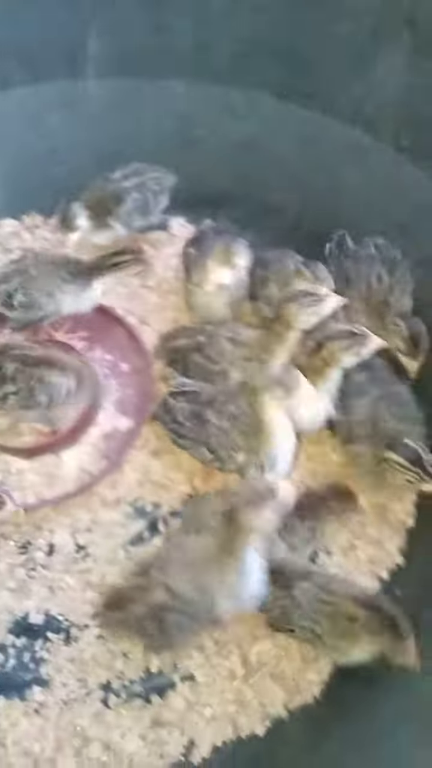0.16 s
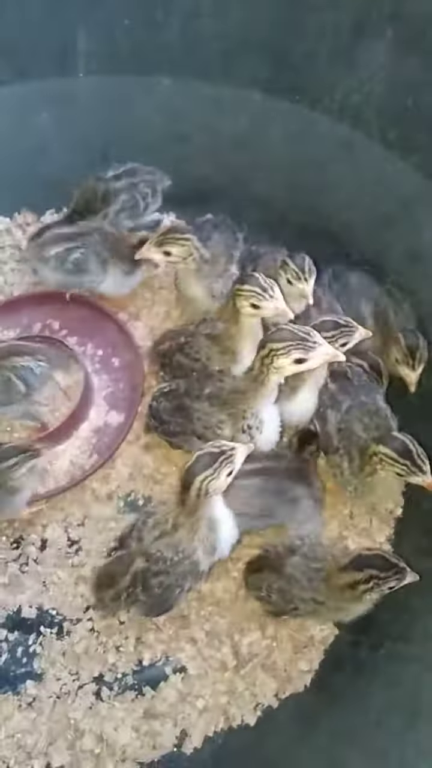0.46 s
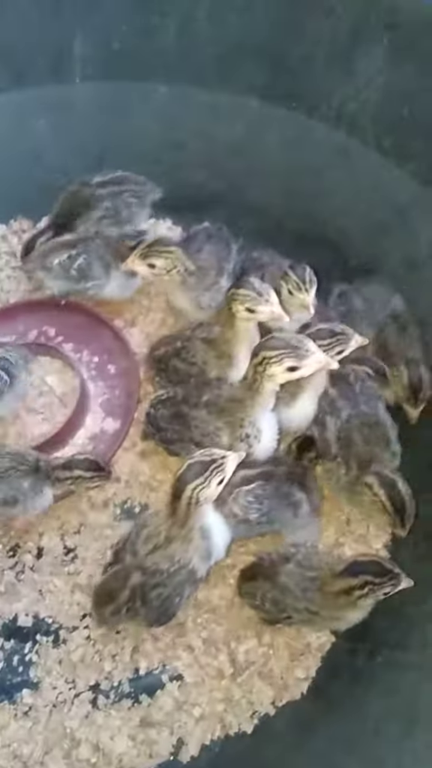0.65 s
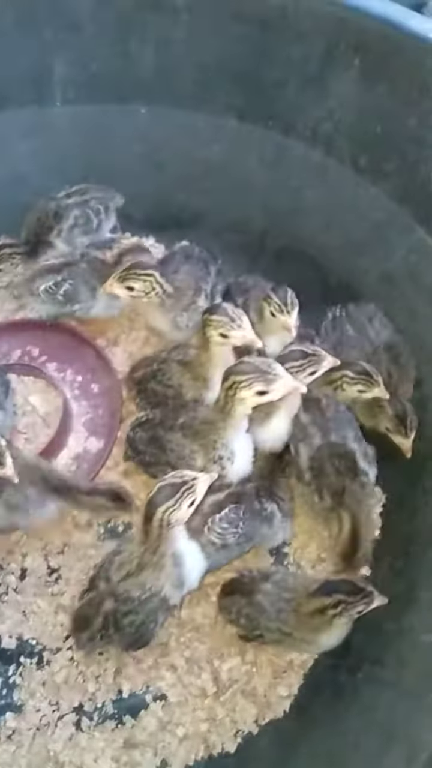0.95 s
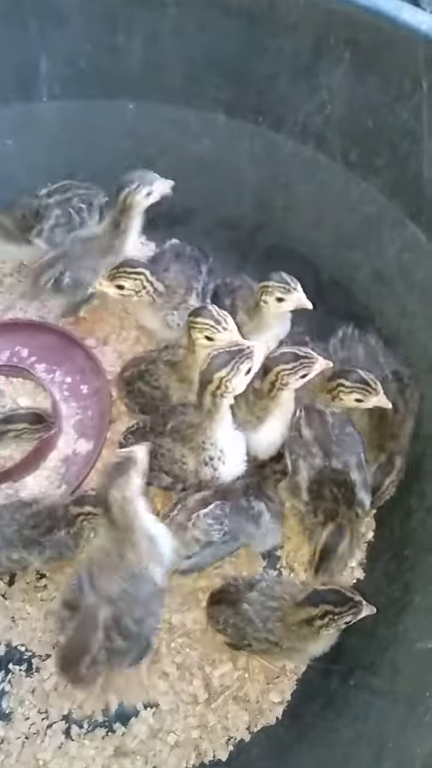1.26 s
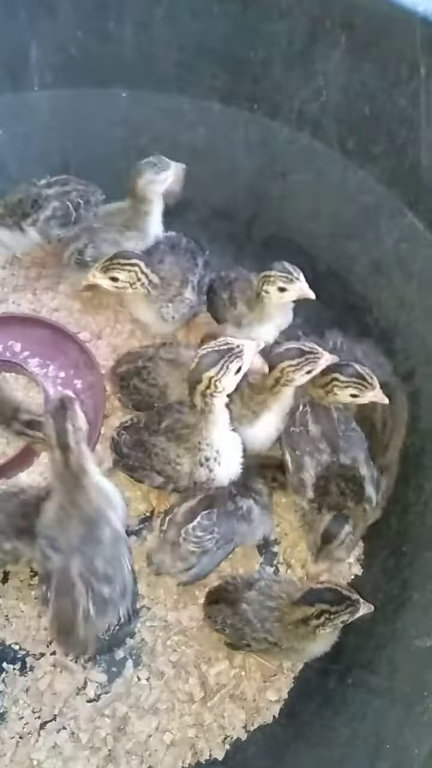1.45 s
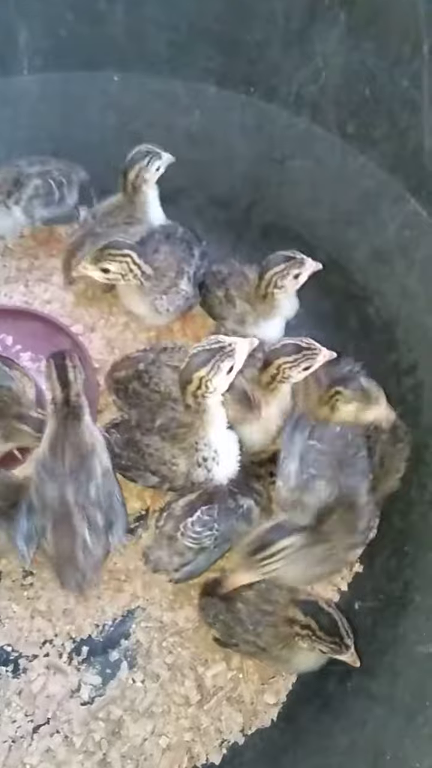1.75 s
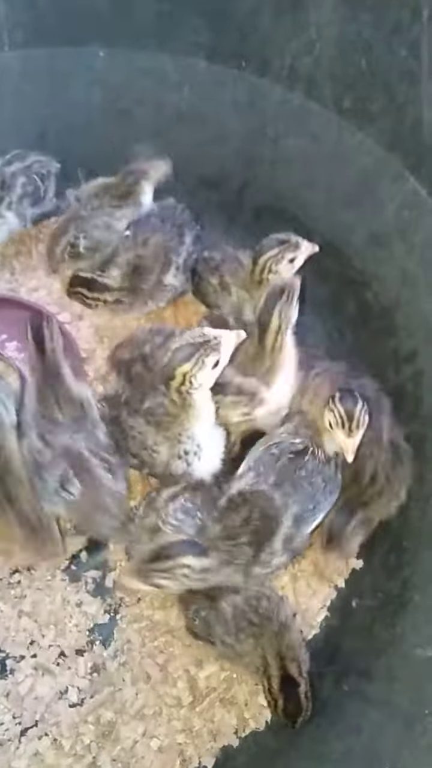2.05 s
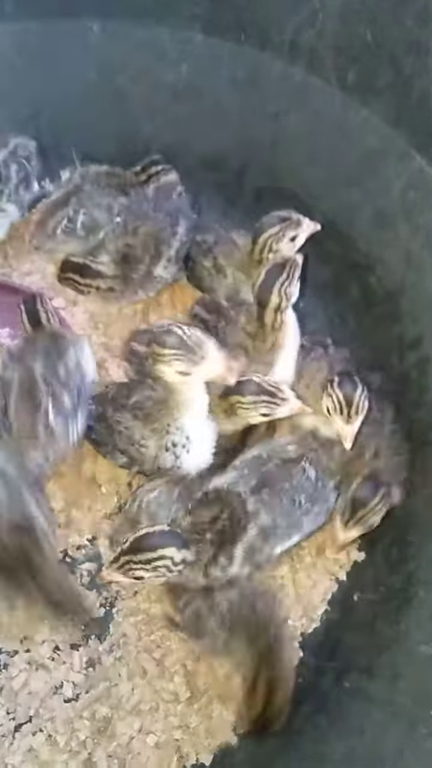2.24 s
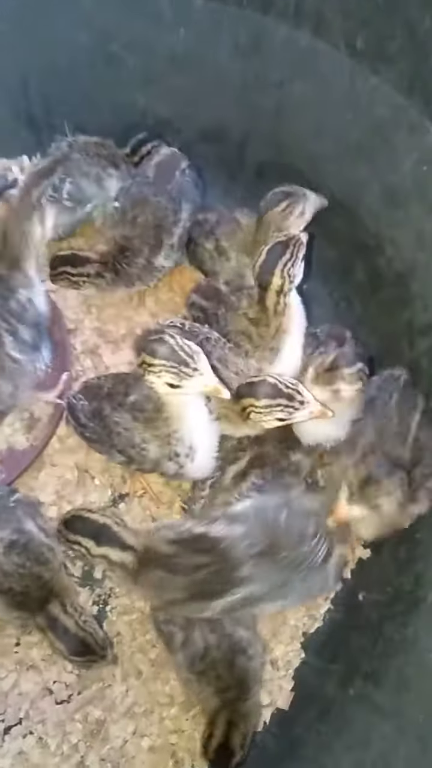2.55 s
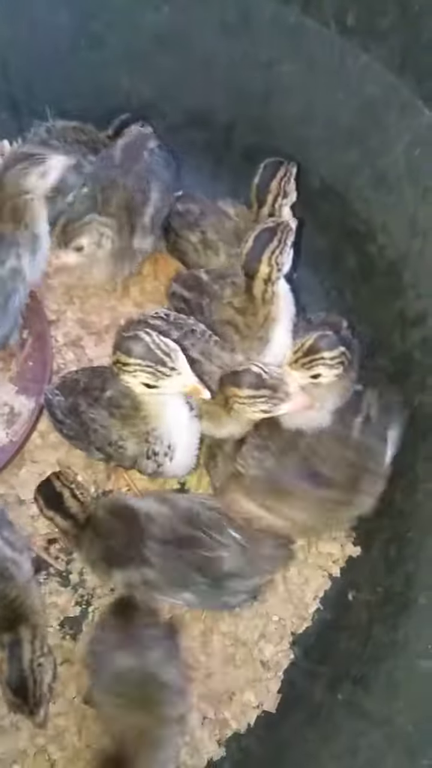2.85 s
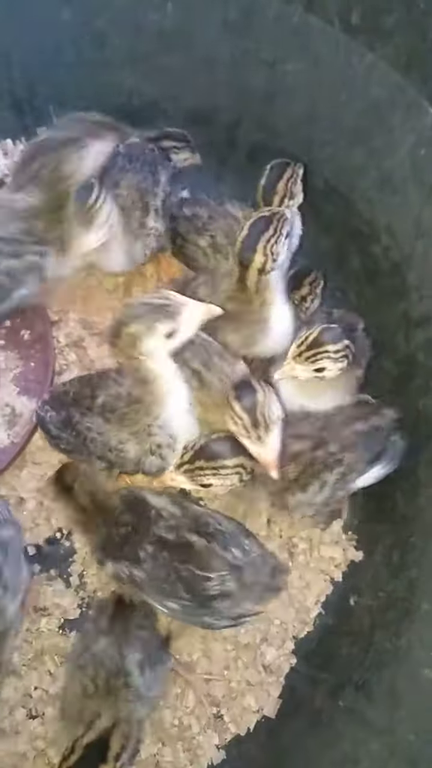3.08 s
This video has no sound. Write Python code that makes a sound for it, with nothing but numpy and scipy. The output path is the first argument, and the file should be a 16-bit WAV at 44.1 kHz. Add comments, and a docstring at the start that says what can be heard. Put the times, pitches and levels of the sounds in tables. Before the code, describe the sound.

Young guinea fowl chicks peep and trill in a plastic tub, feet rustling dry shavings, engines droning faintly

```python
"""Outdoors by a plastic tub: guinea fowl chicks peep and trill, tick on the tub and scuff wood shavings.
Chicks are near-sine whistles; shavings are shaped noise grains; ticks are noise snaps with a short ring.
Outside, two idling engines drone as low multiples of a firing cycle, over traffic murmur and hiss.
A near cricket sweeps sines, a far one is bursts of noise; high-pitched insects are pulsed noise and sweeps."""
import sys
import numpy as np
from scipy import signal
from scipy.fft import rfft, irfft, next_fast_len
from scipy.io import wavfile
from scipy.ndimage import uniform_filter1d

SR = 44100
rng = np.random.default_rng(int(sys.argv[2]) if len(sys.argv) > 2 else 0)


def inscribe(sig):
    """Save sig as 16-bit PCM at rate SR to the path in sys.argv[1].

    A 1-D sig is mono; a 2-D sig holds one channel per row.
    Samples are clipped to [-1, 1] before scaling.
    """
    pcm = np.round(np.clip(np.atleast_2d(sig).T, -1, 1) * 32767)
    wavfile.write(sys.argv[1], SR, pcm.astype(np.int16))


N = 141561


def from_db(db):
    """Amplitude factor of a level in dB."""
    return 10 ** (np.asarray(db) / 20)


def rms_one(x):
    """Scale to rms 1."""
    return x / np.sqrt(np.mean(x ** 2) + 1e-20)


def clock():
    """Time of every sample in seconds."""
    return np.arange(N) / SR


def in_time(rows):
    """Straight lines through the columns of (s, value, ...) rows, one curve per column."""
    s, *columns = np.transpose(rows)
    return [np.interp(clock(), s, column) for column in columns]


def drift(rate_hz):
    """Slow chance of spread 1: noise through a double low-pass, computed at every 40th sample."""
    r = np.exp(-80 * np.pi * rate_hz / SR)
    noise = rng.standard_normal(N // 40 + 2002)
    slow = signal.lfilter([1], [1, -2 * r, r * r], noise)[2000:]  # drop the filter's start
    return np.interp(np.arange(N) / 40, np.arange(len(slow)), rms_one(slow))


def coloured(x, points):
    """Shape a spectrum by (Hz, dB) points joined along log frequency; rms 1."""
    hz, db = np.transpose(sorted(map(tuple, points)))
    size = next_fast_len(N)
    bins = np.maximum(np.arange(size // 2 + 1) * SR / size, 1)
    gain = from_db(np.interp(np.log(bins), np.log(hz), db))
    return rms_one(irfft(rfft(x, size) * gain, size)[:N])


def resonance(x, hz, width_hz):
    """Two-pole band-pass ringing at one frequency."""
    r = np.exp(-np.pi * width_hz / SR)
    poles = [2, -4 * r * np.cos(2 * np.pi * hz / SR), 2 * r * r]
    return signal.lfilter([1 - r * r, 0, r * r - 1], poles, x)


def narrow_noise(x, hz, width_hz):
    """Noise through the same resonance twice; rms 1."""
    return rms_one(resonance(resonance(x, hz, width_hz), hz, width_hz))


def bumps(rows, width_s):
    """Swells peaking at (s, dB): quick rise, slower fall."""
    total = 0
    for s, db in rows:
        age = np.maximum((clock() - s) / width_s + 1, 0)
        total = total + from_db(db) * age * np.exp(1 - age)
    return total


def add(out, s, sound):
    """Mix a sound in at a time, cut at the end of the scene."""
    i = int(s * SR)
    out[i:i + len(sound)] += sound[:max(N - i, 0)]


def glide(from_hz, to_hz, length_s, db):
    """A short sine sweep under a smooth window."""
    n = int(length_s * SR)
    phase = 2 * np.pi * np.cumsum(np.linspace(from_hz, to_hz, n)) / SR
    return from_db(db) * np.sqrt(2) * np.hanning(n) ** 0.11 * np.sin(phase)


# spectrum of the traffic murmur: [f/Hz, relative level/dB]
MURMUR_SPECTRUM = [(25, -6), (70, -4.5), (150, 0), (280, -11), (900, -14), (2500, -27.5), (6000, -83)]
# murmur level, before its waver: [t/s, level/dB]
MURMUR_LEVEL = [(0, -53), (3.21, -48)]
# spectrum of the outdoor hiss: [f/Hz, relative level/dB]
HISS_SPECTRUM = [(3000, -3), (6600, -12), (11000, -13), (15800, -9)]
HISS_DB = -57.5


def air():
    """Traffic murmur and outdoor hiss: shaped noise, each with its own chance level flicker."""
    level_db, = in_time(MURMUR_LEVEL)
    hiss_db = HISS_DB + 2.2 * drift(14)
    murmur_db = level_db + 1.27 * drift(10.7)
    murmur = from_db(murmur_db) * coloured(rng.standard_normal(N), MURMUR_SPECTRUM)
    return murmur + from_db(hiss_db) * coloured(rng.standard_normal(N), HISS_SPECTRUM)


BUZZ_HZ, BUZZ_WIDTH_HZ, BUZZ_DB = 8113, 650, -61.5
PULSES_PER_S, PULSE_START_S, PULSE_DEPTH = 145.52, .0012, .55
GROUP_S, STROKE_S, STROKE_LEN_S = .041, 0.013, 0.008  # mean group spacing, stroke spacing, length
STROKE_RISE_HZ, STROKE_GROWTH_DB = 535, 5.5
# last stroke of a group, before its chance: [t/s, level/dB]
STROKES = [(0, -58), (3.21, -48.5)]


def insects():
    """A steady pulsed noise buzz and groups of three swelling, rising strokes, both near 8 kHz."""
    band = narrow_noise(rng.standard_normal(N), BUZZ_HZ, BUZZ_WIDTH_HZ)
    pulse = 1 + PULSE_DEPTH * np.cos(2 * np.pi * PULSES_PER_S * (clock() - PULSE_START_S))
    out = from_db(BUZZ_DB) * band * pulse
    chance = rng.standard_normal((120, 4))
    starts = np.cumsum(GROUP_S * (1 + 0.14 * chance[:, 3]))
    low_hz, high_hz = BUZZ_HZ - STROKE_RISE_HZ / 2, BUZZ_HZ + STROKE_RISE_HZ / 2
    for s, row in zip(starts, chance):
        last_db = np.interp(s, *np.transpose(STROKES))
        for k in range(3):
            db = last_db + STROKE_GROWTH_DB * (k - 2) + 2.5 * row[k]
            add(out, min(s + k * STROKE_S, N / SR), glide(low_hz, high_hz, STROKE_LEN_S, db))
    return out


# far chirps: [t/s]
FAR_CHIRPS = [.217, .364, 0.52, .657, .818, 1.011, 1.07, 1.185, 1.351, 1.506, 1.656]
FAR_DB, FAR_HZ, FAR_WIDTH_HZ, FAR_S = -56, 4880, 1470, 0.016


def far_cricket():
    """Bursts of narrow noise, blurred by distance."""
    bursts = bumps([(s, FAR_DB) for s in FAR_CHIRPS], FAR_S) * from_db(3.0 * drift(64))
    return bursts * narrow_noise(rng.standard_normal(N), FAR_HZ, FAR_WIDTH_HZ)


# near chirps: [t/s, level/dB]
NEAR_CHIRPS = [(2.687, -50.5), (2.882, -48), (3.08, -48)]
NOTE_GAP_S, NOTE_S, NOTE_TOP_HZ, NOTE_END_HZ = 0.031, 0.017, 5550, 4700
FIRST_NOTE_DB = -2.5  # relative to the other two


def near_cricket():
    """Chirps of three clear falling sine sweeps."""
    out = np.zeros(N)
    for s, db in NEAR_CHIRPS:
        for k in range(3):
            note_db = db + FIRST_NOTE_DB * (k == 0)
            add(out, s + k * NOTE_GAP_S, glide(NOTE_TOP_HZ, NOTE_END_HZ, NOTE_S, note_db))
    return out


HUM_WAVER_DB = 2.5


def hum(hz, db, orders):
    """Low multiples of a firing cycle, each wavering a little."""
    phase = 2 * np.pi * np.cumsum(hz + np.zeros(N)) / SR
    total = 0
    for k, order_db in orders:
        gain = from_db(order_db + HUM_WAVER_DB * drift(1.7))
        total = total + gain * np.sin(k * phase + rng.uniform(0, 2 * np.pi))
    return from_db(db) * total


# first engine, firing cycle: [t/s, f/Hz, level/dB]
FIRST_ENGINE = [(0, 17.1, -51.5), (1.4, 17.6, -47.5), (3.21, 17.0, -45)]
# its multiples from 2 to 12: [relative level/dB]
FIRST_ORDERS = [-14, -11, -35, -3.5, 3, -16, -6, -10.5, -8.5, -22, -19]
SECOND_HZ = 40.94
# second engine, growing louder: [t/s, level/dB]
SECOND_ENGINE = [(0, -47.5), (3.21, -38.5)]
# its multiples: [multiple, relative level/dB]
SECOND_ORDERS = [(1, -3.5), (3, -3.5), (4, -9.5), (5, -12.5), (6, -25)]


def engines():
    """Two idling engines: one with a drifting firing cycle, one steady in pitch."""
    first = hum(*in_time(FIRST_ENGINE), enumerate(FIRST_ORDERS, start=2))
    return first + hum(SECOND_HZ, *in_time(SECOND_ENGINE), SECOND_ORDERS)


TUB_T60_S, TUB_DB = .05, -12


def tub(x):
    """Short diffuse echo of the tub: decaying noise after 2 ms, added to the direct sound."""
    t = np.arange(SR // 8) / SR
    tail = rng.standard_normal(len(t)) * from_db(-60 * t / TUB_T60_S) * (t > .002)
    return x + from_db(TUB_DB) * signal.fftconvolve(x, tail / np.sqrt(np.sum(tail ** 2)))[:N]


# scuffing feet, before their flicker: [t/s, level/dB]
SCUFFS = [(.21, -57), (.66, -53), (.78, -51.5), (1.29, -50), (1.52, -56), (1.67, -52.5), (1.87, -52),
          (2.02, -59.5), (2.11, -52), (2.28, -53.5), (2.36, -58), (2.572, -53.5), (2.73, -52)]
# spectrum of the dry shavings: [f/Hz, relative level/dB]
SHAVINGS = [(700, 12), (3000, 4), (12000, 0.5), (15500, 3.5)]
SCUFF_S, GRAINS_PER_S = 0.024, 3700
PATTER_DB, PATTER_DB_PER_S = -74.5, 4  # start and rise of the small shuffling: the flock grows busier
TILT_DB = 6.5  # chance swing of the treble


def scuffs():
    """Dense uneven grains of dry shavings under each step, over continuous flickering, growing patter."""
    grain_level = from_db(5.6 * np.minimum(rng.exponential(1, N), 3.3))
    grains = grain_level * rng.standard_normal(N) * (rng.random(N) < GRAINS_PER_S / SR)
    steps = bumps(SCUFFS, SCUFF_S) * from_db(3 * drift(60))
    patter = from_db(PATTER_DB + PATTER_DB_PER_S * clock() + 4 * drift(30))
    rustle = coloured(grains + 0.42 * rng.standard_normal(N), SHAVINGS)
    low_pass = signal.butter(4, 11500, "low", fs=SR, output="sos")
    high_pass = signal.butter(4, 11500, "high", fs=SR, output="sos")
    body = signal.sosfilt(low_pass, rustle)
    treble = signal.sosfilt(high_pass, rustle[::-1])  # reversed: fine and coarse grains fall apart
    return (steps + patter) * (body + treble * from_db(TILT_DB * drift(10)))


# claws and beaks on the tub: [t/s, level/dB, f/Hz]
TICKS = [(0.171, -41, 780), (0.332, -38, 920), (.435, -45, 14100), (0.473, -38.5, 5800), (.942, -40, 1240),
         (1.283, -43.5, 1400), (1.409, -32, 8400), (1.61, -34.5, 1640), (1.831, -38, 955),
         (1.847, -37.5, 5060), (2.026, -41.5, 2830), (2.274, -36, 1750), (2.339, -32.5, 2470),
         (2.755, -43, 14000), (2.849, -36, 1710), (2.881, -47, 3940)]
TICK_CYCLES, TICK_SNAP = 2.4, 0.43  # ring decay in cycles; snap relative to ring


def ticks():
    """A sharp noise snap and a few cycles of ring at the same pitch."""
    out, noise = np.zeros(N), rng.standard_normal((len(TICKS), 600))
    t = np.arange(600) / SR
    for (s, db, hz), hit in zip(TICKS, noise):
        ring = np.sin(2 * np.pi * hz * t) * np.exp(-t * hz / TICK_CYCLES)
        snap = TICK_SNAP * narrow_noise(hit, hz, hz) * np.exp(-t / .002)
        add(out, s, from_db(db) * (ring + snap))
    return out


# soft twitter of the rest, loudest notes: [t/s, level/dB]
FLOCK = [(0, -60), (3.21, -63)]
FLOCK_HZ, FLOCK_NOTE_S = 3090, 0.0376


def twitter():
    """Ninety soft short glides at chance times, pitches, lengths and levels."""
    out = np.zeros(N)
    for when, a, b, c in rng.random((90, 4)):
        s, hz = when * N / SR, FLOCK_HZ * (0.89 + 0.31 * a)
        db = np.interp(s, *np.transpose(FLOCK)) - 8 * c  # longer notes are softer
        add(out, s, glide(hz, hz * (.9 + 0.168 * b), FLOCK_NOTE_S * (.5 + c), db))
    return out


# faint low clucks: [t/s, f/Hz, level/dB]
CLUCKS = [(0.757, 1603, -51), (1.436, 2000, -55.5)]
CLUCK_S = 0.015  # half length


def clucks():
    """Short low glides, rising slightly."""
    out = np.zeros(N)
    for s, hz, db in CLUCKS:
        add(out, s - CLUCK_S, glide(0.97 * hz, 1.053 * hz, 2 * CLUCK_S, db))
    return out


# one pitch track per peep, before flutter and waver: [t/s, f/Hz, level/dB]
PEEPS = [
    [(0.128, 2770, -60), (0.21, 2254, -59)],
    [(0.258, 2970, -50), (0.278, 2760, -44.5), (0.296, 3020, -49), (0.308, 2880, -45), (0.317, 2350, -42),
     (0.33, 2180, -58)],
    [(0.262, 3200, -46), (0.29, 4050, -59), (0.299, 3516, -42), (0.307, 3220, -45), (0.347, 3258, -38.5),
     (0.36, 3850, -57), (0.37, 4060, -60), (0.4, 2990, -43)],
    [(0.303, 3800, -56), (0.325, 3950, -54), (0.333, 3110, -38), (0.338, 2710, -37.5), (0.347, 2386, -38.5),
     (0.384, 2910, -46), (0.432, 2780, -45.5), (0.446, 2400, -57)],
    [(1.046, 4140, -60), (1.05, 3060, -31.5), (1.053, 2590, -34), (1.055, 2474, -34), (1.059, 2650, -23.5),
     (1.066, 2533, -25.5), (1.072, 3000, -29), (1.078, 2620, -22), (1.083, 3575, -35.5), (1.088, 3100, -26),
     (1.094, 4010, -46), (1.097, 3450, -62), (1.1, 3110, -28), (1.105, 2550, -42), (1.113, 2576, -27),
     (1.115, 2790, -53), (1.121, 4040, -49), (1.128, 2590, -42), (1.134, 2390, -38), (1.143, 2640, -36),
     (1.148, 3880, -52), (1.155, 2650, -30), (1.161, 2393, -45), (1.167, 2670, -24.5), (1.169, 2950, -59),
     (1.172, 2520, -31), (1.178, 3535, -37), (1.182, 2940, -26), (1.187, 3530, -37), (1.195, 2580, -23),
     (1.201, 3450, -35), (1.205, 3110, -32), (1.211, 3614, -40), (1.218, 2485, -31), (1.225, 2320, -37),
     (1.233, 2630, -34), (1.235, 3210, -37), (1.238, 3430, -45), (1.246, 3370, -63)],
    [(1.39, 3120, -67), (1.445, 3160, -60), (1.472, 2750, -51.5), (1.543, 2855, -56.5), (1.555, 2480, -50)],
    [(1.6, 2190, -56), (1.616, 3290, -45), (1.635, 4300, -61), (1.643, 3680, -41.5), (1.66, 2710, -44.5),
     (1.67, 2335, -37.5), (1.677, 2260, -59)],
    [(1.85, 3280, -55), (1.867, 2587, -55), (1.885, 2490, -44), (1.894, 3140, -40.5), (1.906, 2580, -46),
     (1.919, 3070, -40.5), (1.935, 2700, -44), (1.944, 3010, -42), (1.955, 2730, -44), (1.972, 2867, -42),
     (1.986, 2680, -45), (2.005, 2680, -50.5), (2.016, 2380, -60)],
    [(1.935, 3270, -56), (1.948, 3290, -44), (1.968, 2894, -40)],
    [(2.21, 2340, -55.5), (2.224, 3400, -43), (2.245, 4510, -61), (2.259, 3510, -46), (2.264, 3250, -39.5),
     (2.277, 2315, -41.5), (2.295, 2160, -52)],
    [(2.732, 3530, -50), (2.756, 2920, -37), (2.768, 3136, -36), (2.782, 2950, -38.5), (2.796, 3560, -40.5),
     (2.813, 3230, -37), (2.83, 3630, -39.5), (2.85, 3340, -40.5), (2.862, 2500, -55)],
]
# multiples 2 to 4 at 3.4 kHz: [relative level/dB]
OVERTONES = [-33, -36, -42]
OVERTONE_DB_PER_KHZ = 28  # overtones grow as the pitch rises
FACING_PEEP, FACING_DB = 10, 18  # brighter overtones from the chick facing the microphone
PITCH_FLUTTER = .008  # share of the pitch


def peeps():
    """Whistled near-sines with weak overtones and a fluttering pitch."""
    out, flutter = np.zeros(N), 1 + PITCH_FLUTTER * drift(197)
    for n, rows in enumerate(PEEPS):
        s, hz, db = np.transpose(rows)
        t = np.arange(s[0], s[-1], 1 / SR)
        pitch = uniform_filter1d(np.interp(t, s, hz), size=80) * np.interp(t, clock(), flutter)
        phase = 2 * np.pi * np.cumsum(pitch) / SR
        bright_db = OVERTONE_DB_PER_KHZ * (pitch / 1000 - 3.4) + FACING_DB * (n == FACING_PEEP)
        bright_db = np.maximum(bright_db, -3)
        tone = np.sin(phase)
        for k, overtone_db in enumerate(OVERTONES, start=2):
            tone = tone + from_db(overtone_db + bright_db) * np.sin(k * phase)
        level_db = uniform_filter1d(np.interp(t, s, db), size=60)
        edge = np.clip(np.minimum(t - s[0], s[-1] - t) / 0.0011, 0, 1)
        add(out, s[0], np.sqrt(2) * from_db(level_db) * edge * tone)
    return out


WAVER_DB = 2.4


def chicks():
    """All the voices under one quick level waver."""
    return (twitter() + clucks() + peeps()) * from_db(WAVER_DB * drift(160))


def scene():
    """Voices, ticks and crickets take the tub's echo, the crickets three times over; the rest is dry."""
    crickets = tub(tub(far_cricket() + near_cricket()))
    in_tub = tub(crickets + ticks() + chicks())
    return (air() + insects() + engines() + scuffs() + in_tub)[None]


def record(dry):
    """A steep low-pass cuts the top above 15.85 kHz."""
    return signal.sosfilt(signal.ellip(14, .5, 90, 15850, fs=SR, output="sos"), dry)


dry = scene()
out = record(dry)
inscribe(out)
```